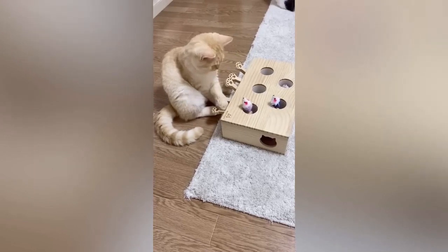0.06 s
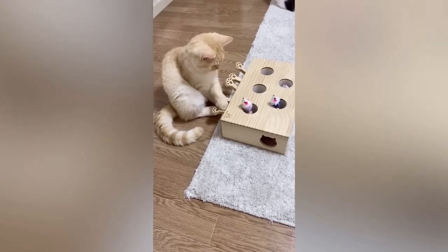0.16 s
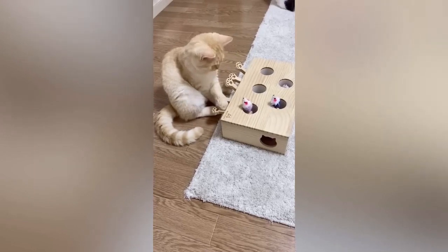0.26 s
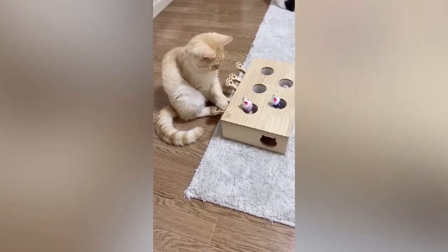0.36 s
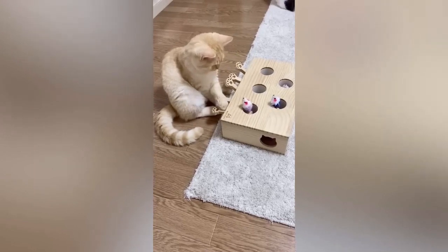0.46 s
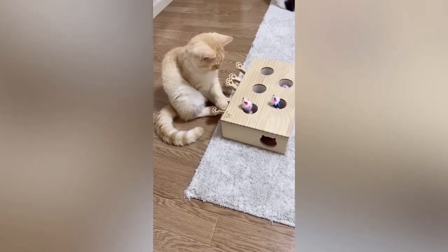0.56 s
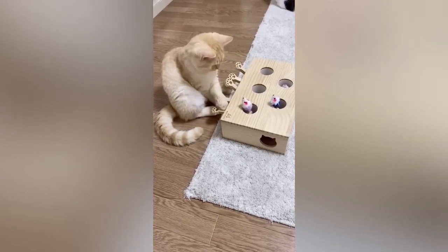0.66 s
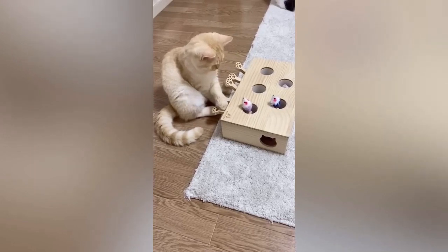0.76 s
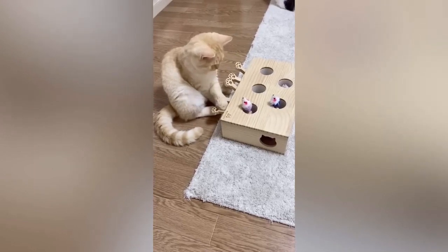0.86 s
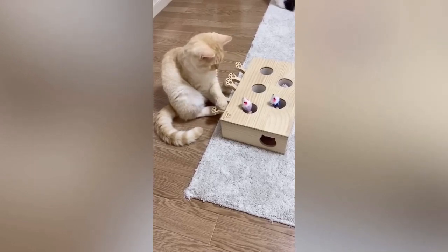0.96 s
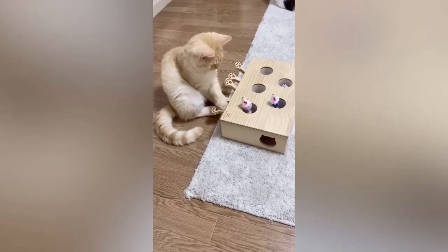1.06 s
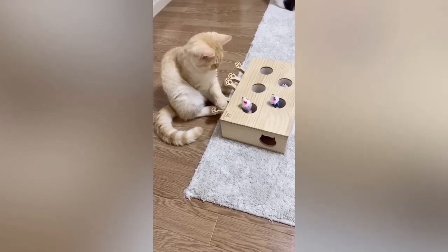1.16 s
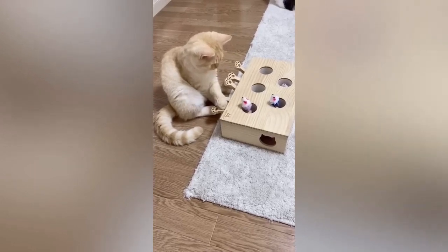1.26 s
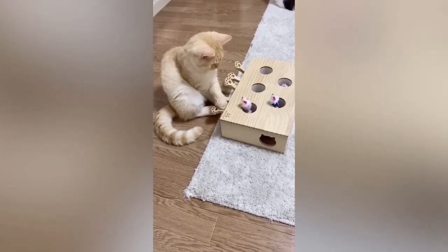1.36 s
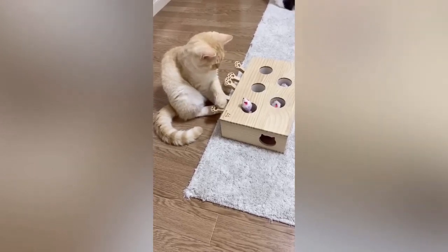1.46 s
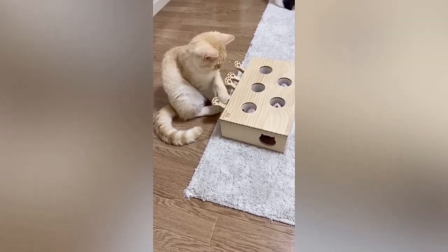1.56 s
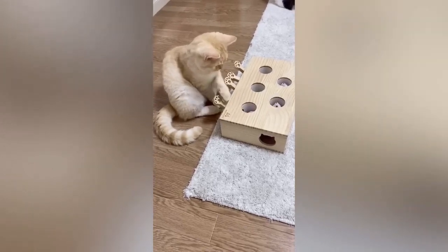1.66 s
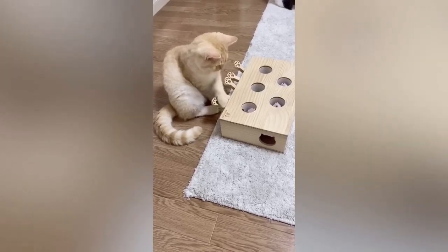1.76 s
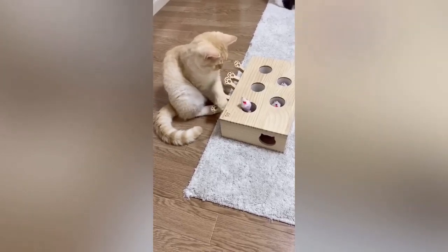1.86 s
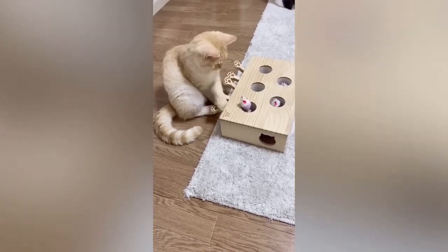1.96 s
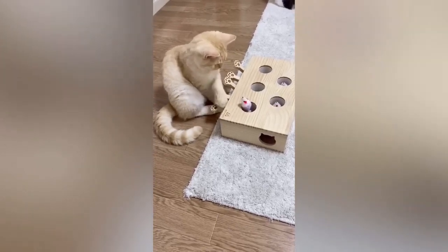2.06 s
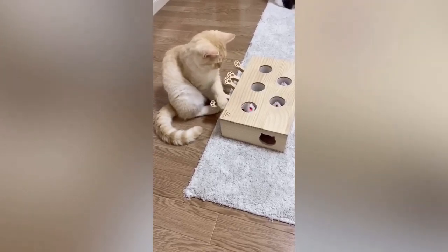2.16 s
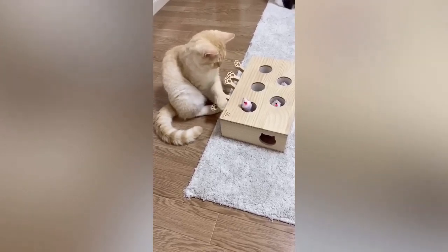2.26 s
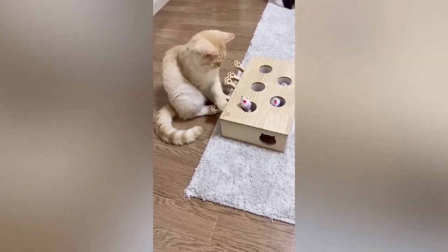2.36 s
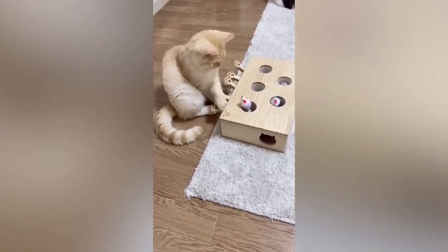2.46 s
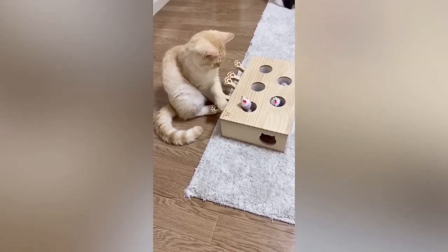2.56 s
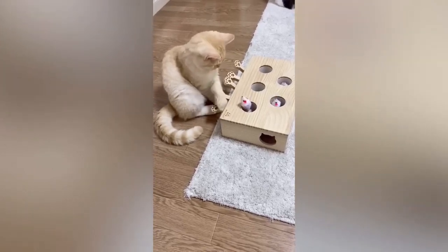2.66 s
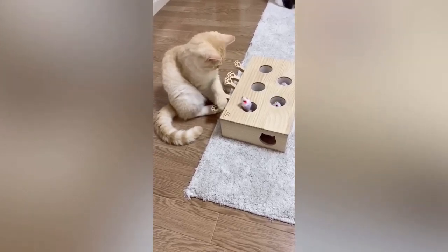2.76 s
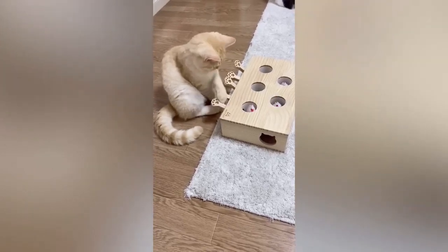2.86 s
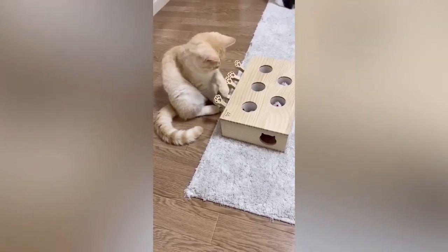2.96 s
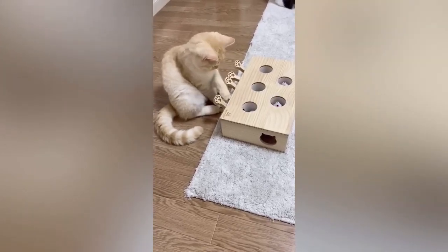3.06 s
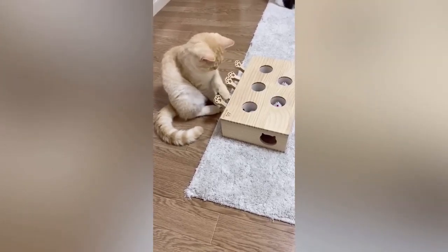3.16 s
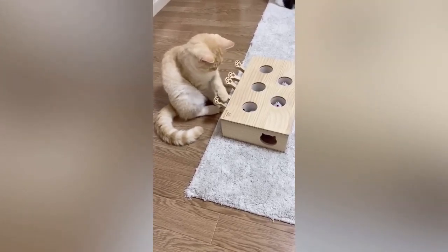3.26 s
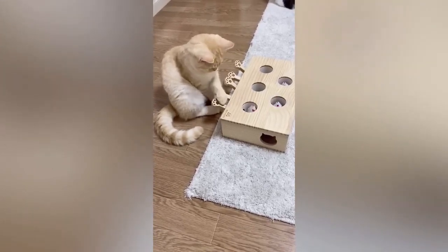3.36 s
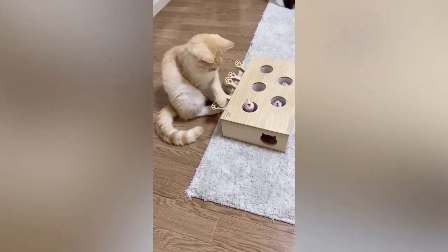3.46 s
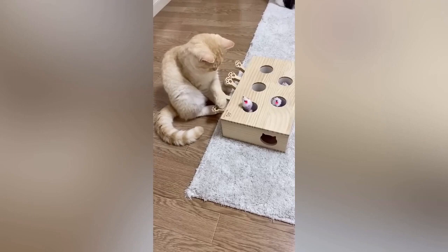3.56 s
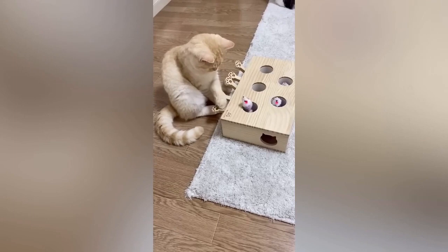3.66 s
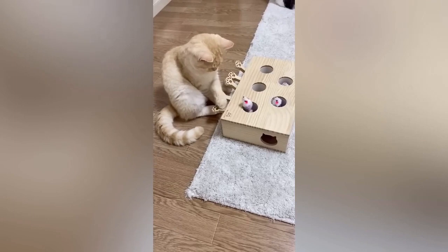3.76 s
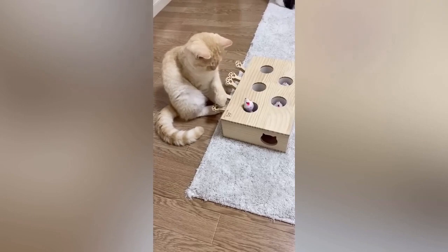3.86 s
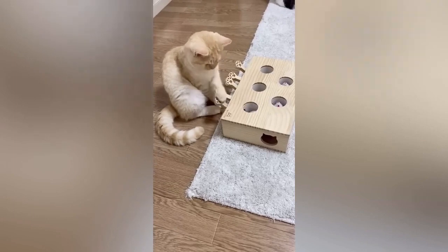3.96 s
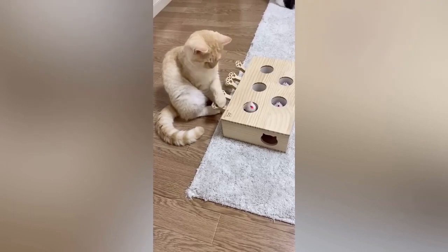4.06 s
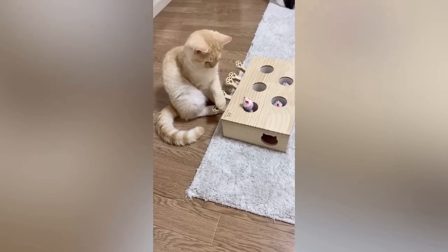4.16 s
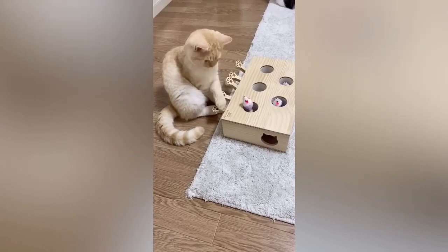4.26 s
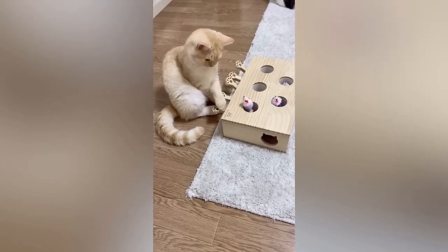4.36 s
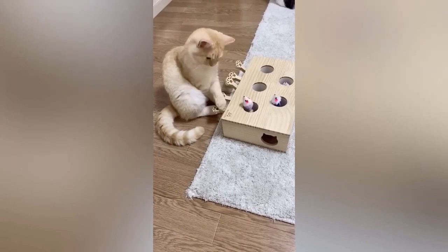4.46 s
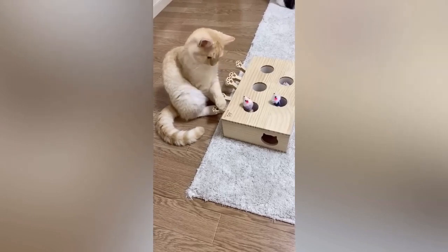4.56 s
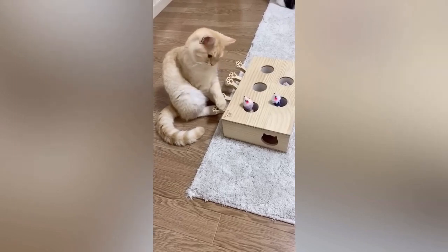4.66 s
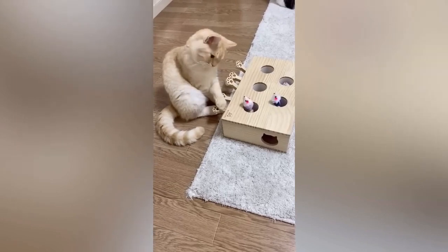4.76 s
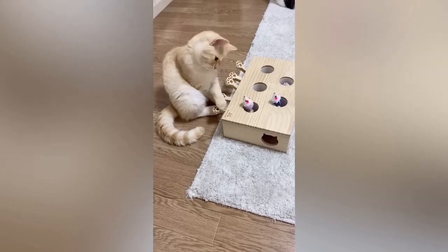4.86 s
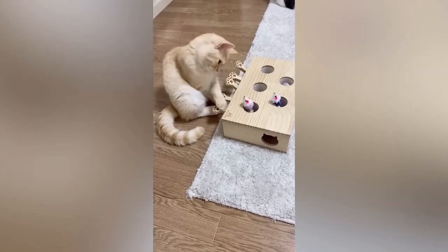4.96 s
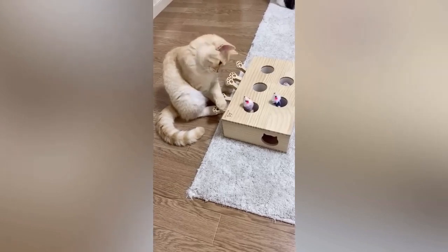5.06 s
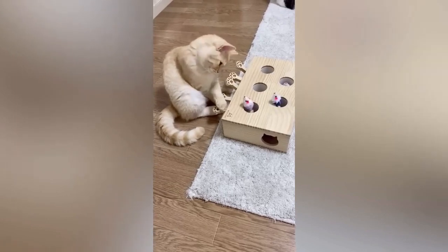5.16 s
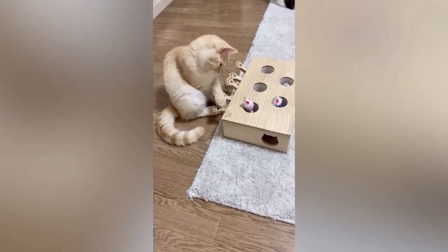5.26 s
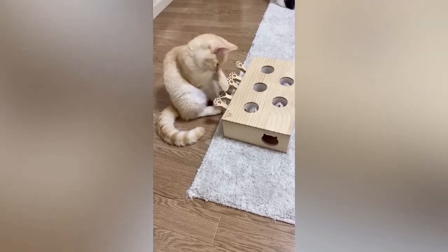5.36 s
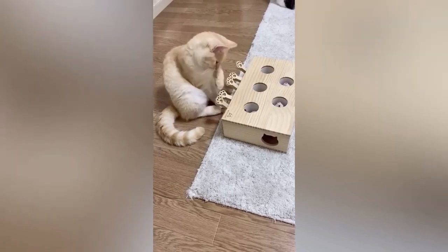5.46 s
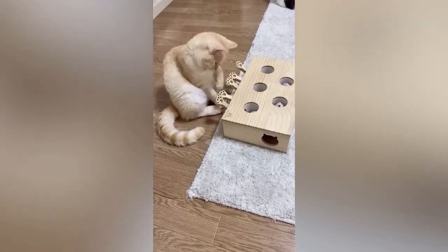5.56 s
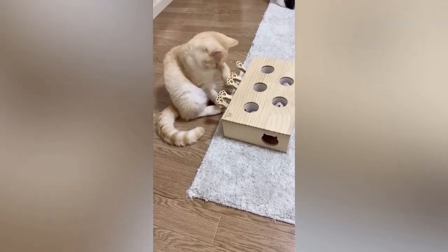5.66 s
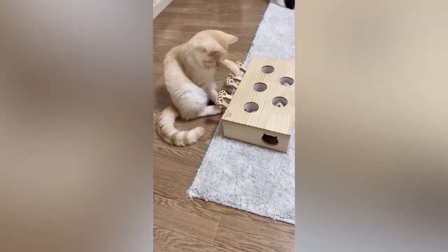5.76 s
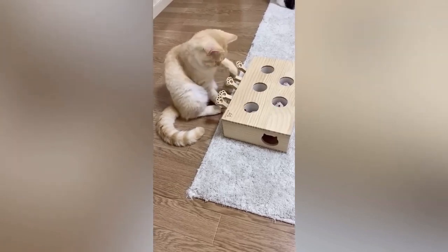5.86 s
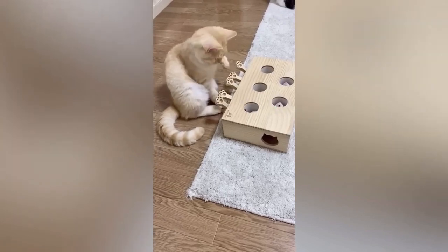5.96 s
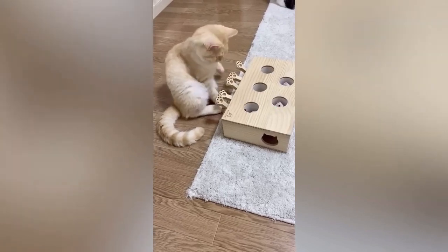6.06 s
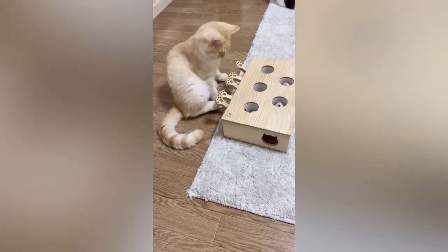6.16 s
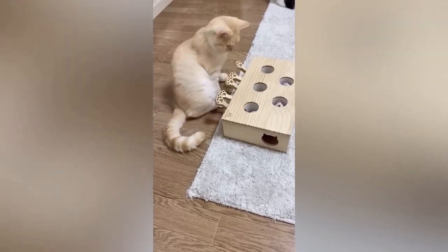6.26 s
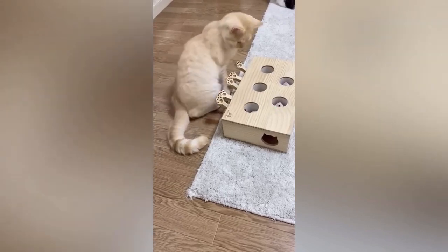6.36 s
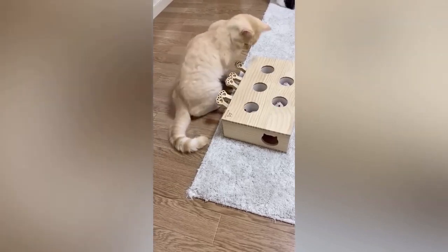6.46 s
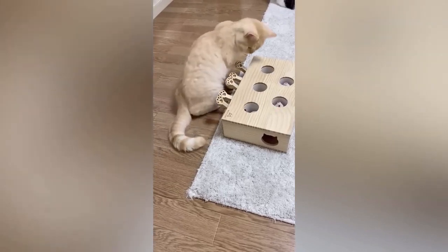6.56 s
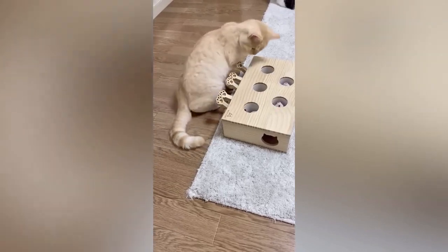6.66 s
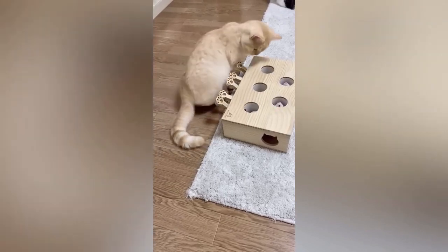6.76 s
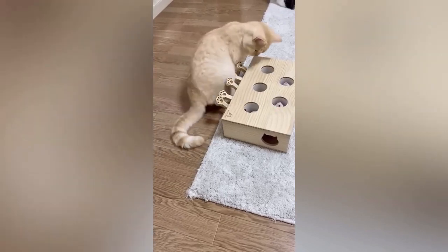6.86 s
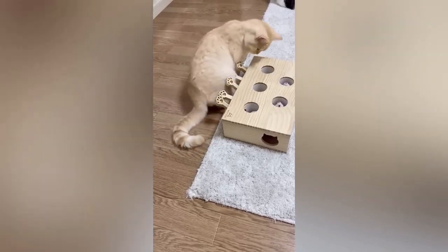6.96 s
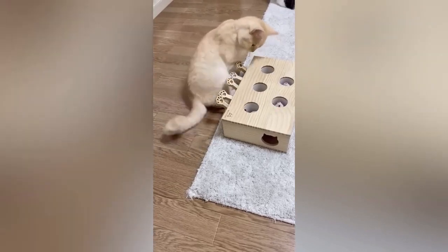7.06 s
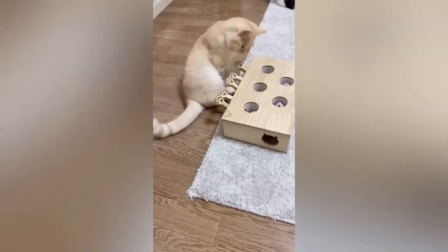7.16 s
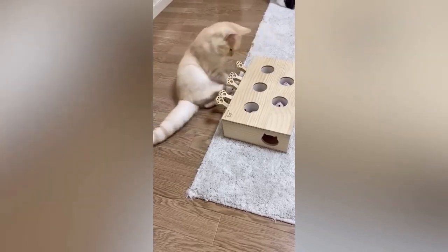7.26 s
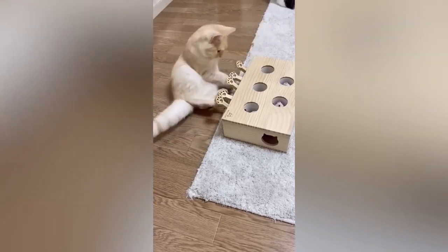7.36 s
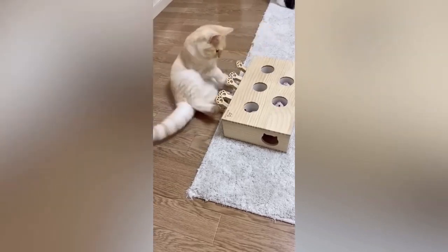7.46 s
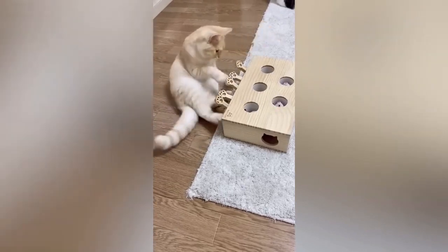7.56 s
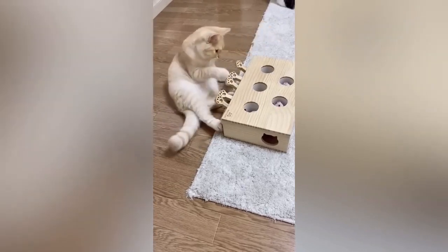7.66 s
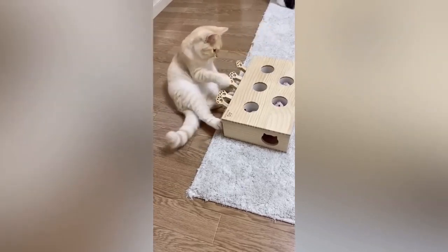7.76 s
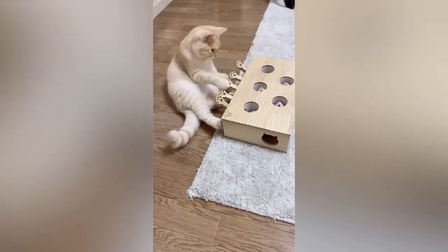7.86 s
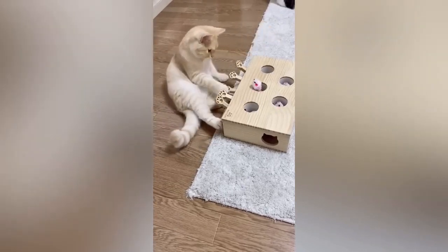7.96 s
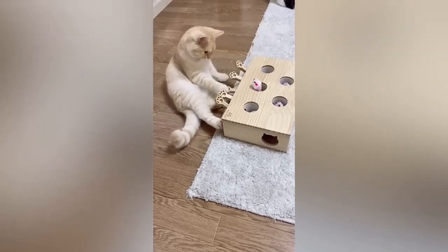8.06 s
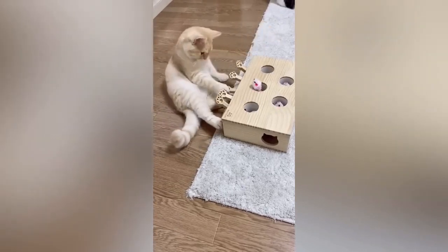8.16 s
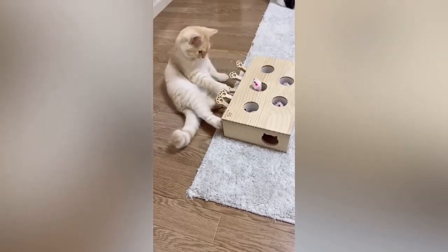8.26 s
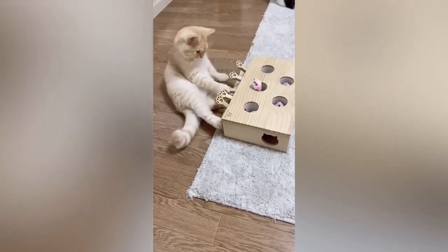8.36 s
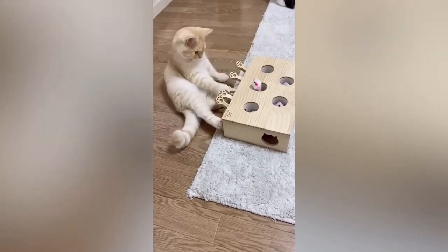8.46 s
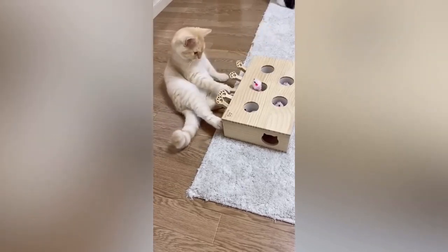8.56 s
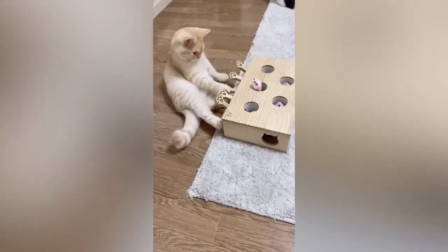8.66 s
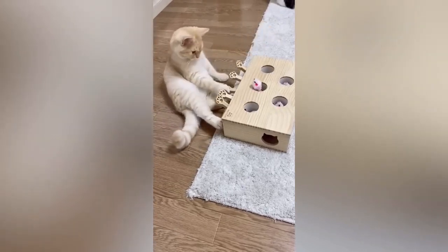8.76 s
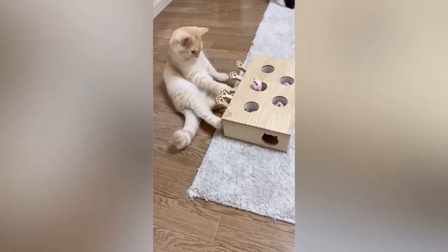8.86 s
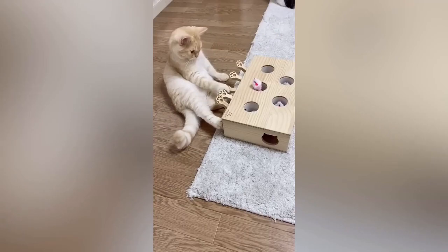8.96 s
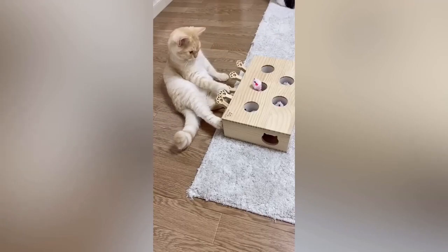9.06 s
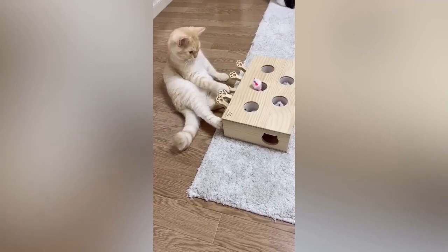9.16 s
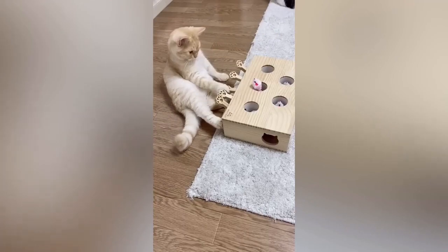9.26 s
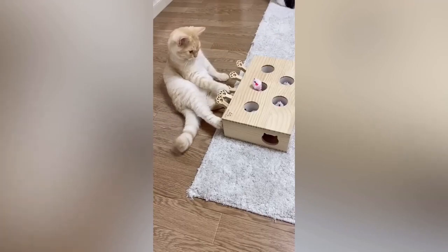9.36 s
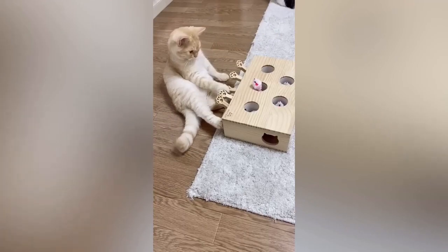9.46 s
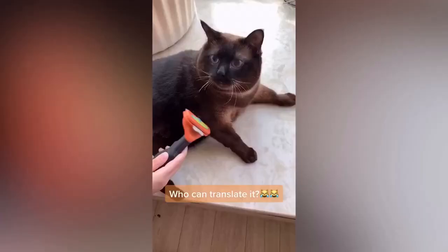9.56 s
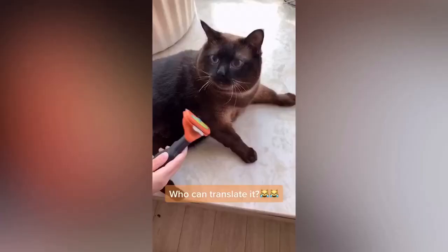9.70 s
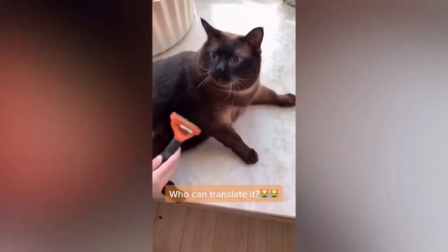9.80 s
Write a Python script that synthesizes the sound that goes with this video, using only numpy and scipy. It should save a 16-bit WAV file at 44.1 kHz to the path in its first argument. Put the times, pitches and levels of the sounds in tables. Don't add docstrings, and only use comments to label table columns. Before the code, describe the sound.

A cat bats the levers of a hollow plywood toy box, sharp irregular wooden knocks and clicks in a small room over dull ventilation hum.

```python
import sys
import numpy as np
from scipy import signal
from scipy.fft import rfft, irfft, next_fast_len
from scipy.io import wavfile
from scipy.ndimage import uniform_filter1d

SR = 44100
rng = np.random.default_rng(int(sys.argv[2]) if len(sys.argv) > 2 else 0)


def gain_from_db(level_db):
    decades = np.asarray(level_db, float) / 20
    return 10 ** decades


def dump(signal):
    limited = np.clip(np.atleast_2d(signal).T, -1, 1)
    pcm = np.round(limited * 32767).astype(np.int16)
    wavfile.write(sys.argv[1], SR, pcm)


N = 433503

# (frequency [Hz], level per Hz [dB])
HUM_COLOUR = [(30, -25), (56, -30.5), (66, -14), (105, -17.5), (125, -1.5), (230, -11.5), (520, -7.5),
              (700, -11.5), (1000, -20), (1400, -19), (1900, -33.5), (2380, -33.5), (3100, -46),
              (3600, -46.5)]
# (frequency [Hz], left-right correlation [-1 to 1])
HUM_LIKENESS = [(60, 1.0), (150, 1), (380, 0.91), (950, 0.55), (2380, 0.21), (5980, -0.39), (15000, 0.07)]
# (frequency [Hz], width [Hz], rms level [dB])
HUM_RESONANCES = [(75.2, 6, -63), (90.4, 16, -57.5), (143.3, 10, -55.5), (256.3, 12, -59.5),
                  (317.8, 13, -61.5), (453.4, 16, -62)]
# (time [s], level [dB])
FLECKS = [(0.89, -86), (1.032, -84.5), (1.306, -86.5), (1.49, -80.5), (2.858, -90), (4.615, -86),
          (4.848, -88), (5.199, -88.5), (6.019, -83.5), (6.302, -86), (6.55, -81.5), (6.684, -87.5),
          (6.981, -89.5), (7.771, -88), (8.93, -84), (9.058, -84.5), (0.257, -94), (3.039, -90),
          (3.991, -91), (5.766, -91), (5.853, -88), (6.192, -90.5), (7.45, -89), (7.559, -89),
          (7.835, -88.5), (8.733, -89), (9.285, -87.5)]
# (time [s], fizz level [dB], tick against fizz [dB])
SNAPS = [(1.686, -52.5, -3), (1.8, -47, -8), (2.066, -38, -7.5), (2.261, -48.5, -7), (2.358, -85, 28),
         (3.142, -42.5, -2), (4.057, -53, -7), (4.183, -36.5, -3.5), (4.191, -33, -1.5), (4.312, -40.5, -1),
         (4.324, -47.5, -1), (5.511, -39, -3), (5.523, -52.5, -23.5), (5.608, -63, -6), (7.134, -64, -1),
         (8.135, -60.5, -4)]
# (time [s], blow level [dB], knock pitch [Hz], slat against blow [dB], tick against blow [dB])
KNOCKS = [(1.687, -12, 858, -11.5, -50.5), (1.801, -9, 775, -9.5, -29.5), (2.067, -23.5, 670, -3, -4),
          (2.261, -6, 853, -13, -39.5), (2.509, -27.5, 892, -6, -23.5), (3.139, -11, 785, -3.5, -23.5),
          (4.055, -9.5, 818, -10.5, -38.5), (4.183, -9, 782, -9.5, -31), (4.311, -21, 808, -9, -11),
          (5.511, -4, 847, -15.5, -32), (5.608, -7.5, 746, -8.5, -25), (7.095, -26, 1016, 1, -27),
          (8.134, -23, 644, -12.5, -32.5), (8.176, -20, 674, -16, -41.5)]
BOUNCES = [
    (2.079, -20, 872, -8.5, -41),
    (2.519, -31, 900, -10, -40),
    (3.1433, -23.5, 826, -20, -13.5),
    (4.067, -24.5, 807, -3.5, -22.5),
    (4.324, -14.5, 687, -7.5, -24),
    (5.519, -11, 914, -4.5, -46.5),
    (5.612, -10.5, 917, -21, -27.5),
]
# (time [s], blow level [dB], knock pitch [Hz])
TOUCHES = [
    (2.356, -27.5, 683),
    (2.404, -33.5, 716),
    (2.985, -36, 850),
    (3.115, -32, 960),
    (6.05, -29.5, 673),
    (7.176, -28, 587),
]
# (frequency [Hz], level [dB])
SLAT_COLOUR = [(900, -19.5), (1250, 5.5), (1550, 4), (2000, -1.5), (2350, -7), (2900, -14.5), (3600, -35)]
# (frequency [Hz], level [dB])
TICK_COLOUR = [(2000, -23), (2800, -8), (3900, 5.5), (4500, 0), (5300, -7), (6200, -9), (7500, -29)]
# (frequency [Hz], level [dB])
FIZZ_COLOUR = [(5500, -30), (7300, 6.5), (8500, -2.5), (10200, 2.5), (11800, -6), (13200, -2),
               (14800, -12.5), (15800, -26), (16400, -61.5)]
# (frequency [Hz], level [dB], t60 [s])
PANEL_MODES = [(624, -3, 0.29), (753.5, -2, 0.22), (969, -3, 0.12), (1146, -6, 0.264), (1572, -23.5, 0.19),
               (1885, -30, 0.14), (1888, -25.5, 0.031), (2140, -36.5, 0.18), (2191, -39, 0.1277),
               (2990, -35.5, 0.36), (2820, -39, 0.16), (3871, -39, 0.081)]
# (frequency [Hz], level [dB], t60 [s])
BOX_AIR = (170, -41, 0.2)
# (delay [s], left level [dB], right level [dB])
ECHOES = [(.0040, -19.5, -29), (.0098, -16, -15), (0.0121, -12, -17.5), (.017, -23.5, -11.5),
          (.021, -19.5, -17.5)]
# (frequency [Hz], t60 [s])
ROOM_DECAY = [(200, 0.26), (530, 0.32), (1390, 0.22), (3680, 0.22), (9700, 0.25)]
# (frequency [Hz], left minus right [dB])
PORT_LEAN = [(60, 0.5), (150, 0), (380, 2), (950, 2), (2380, -0.5), (5980, -1.5), (15000, 0)]
# (frequency [Hz], left leads by [rad])
PORT_LEAD = [(300, 0), (600, -.25), (850, -.35), (1120, -.8), (1800, -1.2), (2150, .3), (4000, .6)]

HUM_DB, GRAIN_DB = -44.5, -100
FAINT_PER_S, FAINT_DB, FAINT_SPREAD_DB = 1, -97, 3
TOUCH_SLAT_DB, TOUCH_TICK_DB = -16.5, -41.5
FIZZ_UNDER_TICK_DB = -31
SMEAR_DB = -26
LEAD_IN_S = 0.025
CONTACT_S = 0.0013
TOP_HZ = 15900
CUT_S, FADE_S = 9.77, 0.011


def evened(x):
    return x / np.sqrt(np.mean(x ** 2) + 1e-20)


def read(points, hz):
    f, value = np.transpose(points)
    return np.interp(np.log(hz + 1), np.log(f + 1), value)


def patchy(shape, across, along):
    patches = uniform_filter1d(rng.standard_normal(shape), size=across, axis=0)
    return evened(uniform_filter1d(patches, size=along, axis=1))


def tinted(x, colour):
    size = x.shape[-1]
    gain = gain_from_db(read(colour, np.fft.rfftfreq(size, 1 / SR)))
    return evened(irfft(rfft(x) * gain, size))


def add(mix, s, sound):
    part = mix[..., round(s * SR):][..., :sound.shape[-1]]
    part += sound[..., :part.shape[-1]]


def swell(t, rise, t60):
    after = np.maximum(t, 0)
    shape = after / (after + rise) * gain_from_db(-60 * after / t60)
    smear = gain_from_db(-20 + 2000 * t) * (t < 0)
    return shape / shape.max() + smear


def hum():
    frames, hz = N // 1024 + 5, np.fft.rfftfreq(4096, 1 / SR)
    a, b, c, d = rng.standard_normal((4, len(hz), frames))
    patches_db = 0.6 * patchy((len(hz), frames), 40, 2)
    likeness = np.clip(read(HUM_LIKENESS, hz), -1, 1)[:, None]
    left = a + 1j * b
    right = likeness * left + np.sqrt(1 - likeness ** 2) * (c + 1j * d)
    colour_db = read(HUM_COLOUR, hz) - 0.005 * np.maximum(hz - 3600, 0)
    z = np.array([left, right]) * gain_from_db(colour_db[:, None] + patches_db)
    wash = signal.istft(z, nperseg=4096, noverlap=3072)[1][:, :N]
    wash = gain_from_db(HUM_DB - 1.5) * evened(wash)

    size = next_fast_len(N)
    fine_hz = np.fft.rfftfreq(size, 1 / SR)
    lumps = sum(gain_from_db(2 * db) / width * np.exp(-np.pi * ((fine_hz - f) / width) ** 2)
                for f, width, db in HUM_RESONANCES)
    resonances = irfft(rfft(rng.standard_normal(size)) * np.sqrt(lumps * SR / 2), size)[:N]
    return wash + resonances


def flecks():
    gate = np.zeros(N)
    window = signal.windows.tukey(1700, 0.5)
    when, size = rng.random((round(FAINT_PER_S * N / SR), 2)).T
    faint_s = 0.03 + when * (CUT_S - 0.1)
    faint_db = FAINT_DB + FAINT_SPREAD_DB * (2 * size - 1)
    for s, db in [*FLECKS, *zip(faint_s, faint_db)]:
        add(gate, s - 0.019, gain_from_db(db + 5.0) * window)
    hz, _, z = signal.stft(rng.standard_normal((2, N)), SR, nperseg=1024)
    ragged = patchy(z.shape[1:], 16, 4)
    hz = hz[:, None]
    z *= (ragged > (hz - 7500) / 2500) * (hz > 3200)
    hiss = evened(signal.istft(z, SR, nperseg=1024)[1][:, :N])
    return gate * hiss + gain_from_db(GRAIN_DB) * rng.standard_normal((2, N))


def snap(row, grit):
    s, fizz_db, tick_db = row
    t = np.arange(grit.shape[1]) / SR - LEAD_IN_S
    grit = grit[0] + 0.5 * grit[1:]
    smear = gain_from_db(SMEAR_DB) * np.sin(np.pi / 2 * np.clip(1 + t / LEAD_IN_S, 0, 1)) * (t < 0)
    tick = (swell(t, 0.0012, 0.043) + smear) * tinted(grit, TICK_COLOUR) * gain_from_db(tick_db - 1.5)
    fizz = (swell(t, 0.00099, 0.033) + smear) * tinted(grit, FIZZ_COLOUR) * gain_from_db(-4.0)
    return gain_from_db(fizz_db) * (fizz + tick)


def knock(row, grit):
    s, blow_db, hz, slat_db, tick_db = row
    t = np.arange(grit.shape[1]) / SR - LEAD_IN_S
    late = t - 0.003
    turns = hz * late * (1 - 90 * np.minimum(late, 0))
    body_width = np.where(late < 0, 0.0014, 0.0015)
    body = -np.cos(2 * np.pi * turns) * np.exp(-(late / body_width) ** 2)
    ring_shape = swell(late, 0.0033, 0.074) * (late > 0)
    lever = np.sin(2 * np.pi * 1.4 * hz * t) * ring_shape * gain_from_db(-21.5)
    thud = -np.cos(2 * np.pi * 0.49 * hz * late) * np.exp(-(late / 0.0016) ** 2) * gain_from_db(-13.5)
    grit = grit[0] + 0.5 * grit[1:]
    slat = swell(t, 0.00043, 0.032) * tinted(grit, SLAT_COLOUR) * gain_from_db(slat_db - 5.5)
    tick = swell(t, 0.0004, 0.025) * tinted(grit, TICK_COLOUR) * gain_from_db(tick_db - 2.5)
    fizz = swell(t, 0.00099, 0.05) * tinted(grit, FIZZ_COLOUR) * gain_from_db(tick_db + FIZZ_UNDER_TICK_DB)
    return gain_from_db(blow_db) * (body + lever + thud + slat + tick + fizz)


def box(x):
    t = np.arange(SR // 4) / SR
    panels = sum(gain_from_db(0.3 * db - 60 * t / t60) * np.sin(2 * np.pi * hz * t) for hz, db, t60 in PANEL_MODES)
    hz, db, t60 = BOX_AIR
    air = gain_from_db(db - 60 * t / t60) * np.sin(2 * np.pi * hz * t)
    return x + signal.oaconvolve(x.mean(0), gain_from_db(-55.5) * panels + air)[:N]


def room(x):
    taps = np.zeros((2, SR // 2))
    slots = np.arange(300, SR // 2 - 20, 20)
    at = slots + rng.integers(0, 20, (2, (SR // 2 - 301) // 20))
    np.put_along_axis(taps, at, rng.choice([-1., 1.], at.shape), 1)
    taps = taps + 0.45 * taps[::-1]
    hz, t, z = signal.stft(taps, SR, nperseg=256)
    decay = gain_from_db(-60 * t / read(ROOM_DECAY, hz)[:, None])
    tail = signal.istft(z * decay, SR, nperseg=256)[1]
    echoes = np.zeros_like(tail)
    for s, left_db, right_db in ECHOES:
        echoes[:, round(s * SR)] = gain_from_db([left_db, right_db])
    dull_echoes = signal.lfilter(*signal.butter(2, 2500, fs=SR), echoes)
    path = gain_from_db(-8.5) * tail / np.linalg.norm(tail[0]) + dull_echoes
    return x + signal.oaconvolve(x, path, axes=1)[:, :N]


def scene():
    levers = np.zeros((2, N))
    touches = [(*row, TOUCH_SLAT_DB, TOUCH_TICK_DB) for row in TOUCHES]
    grits = rng.standard_normal((48, 3, 4000))
    for row, grit in zip(KNOCKS + BOUNCES + touches, grits):
        add(levers, row[0] - CONTACT_S - LEAD_IN_S, knock(row, grit))
    for row, grit in zip(SNAPS, grits[::-1]):
        add(levers, row[0] - CONTACT_S - LEAD_IN_S, snap(row, grit))
    return room(box(levers)) + hum()


def ports(dry):
    size = next_fast_len(N + 4096)
    hz = np.fft.rfftfreq(size, 1 / SR)
    low_cut = 1 / np.sqrt(1 + (55 / (hz + 1)) ** 4)
    band = low_cut / (1 + (hz / TOP_HZ) ** 60)
    port = gain_from_db(read(PORT_LEAN, hz) / 2) * np.exp(0.5j * read(PORT_LEAD, hz))
    return irfft(rfft(dry, size) * band * np.array([port, 1 / port]), size)[:, :N]


def starve(x):
    hz, _, z = signal.stft(x, SR, nperseg=1024)
    power = (abs(z) ** 2).mean(0)
    whole_db = 10 * np.log10(power.sum(0) + 1e-14)
    edges = np.arange(76, 400, 18)
    band_db = 10 * np.log10(np.add.reduceat(power, edges) + 1e-14)
    whim_db = 2.4 * patchy(band_db.shape, 1, 3)
    whim_db = whim_db + 0.039 * np.abs(edges[:, None] - 110)
    floor_db = np.maximum(whole_db - 50, -85) + whim_db
    keep = 1 / (1 + gain_from_db(6 * (floor_db - band_db).clip(-20, 20)))
    band_of_bin = np.searchsorted(edges, np.arange(edges[0], len(hz)), "right") - 1
    z[:, edges[0]:] *= keep[band_of_bin]
    return signal.istft(z, SR, nperseg=1024)[1][:, :N]


def top_cut(x):
    return signal.sosfilt(signal.butter(12, 16330, fs=SR, output="sos"), x)


def record(dry):
    heard = starve(ports(dry)) + flecks()
    fade = np.clip((CUT_S - np.arange(N) / SR) / FADE_S, 0, 1)
    return top_cut(heard * fade)


dry = scene()
out = record(dry)
dump(out)
```